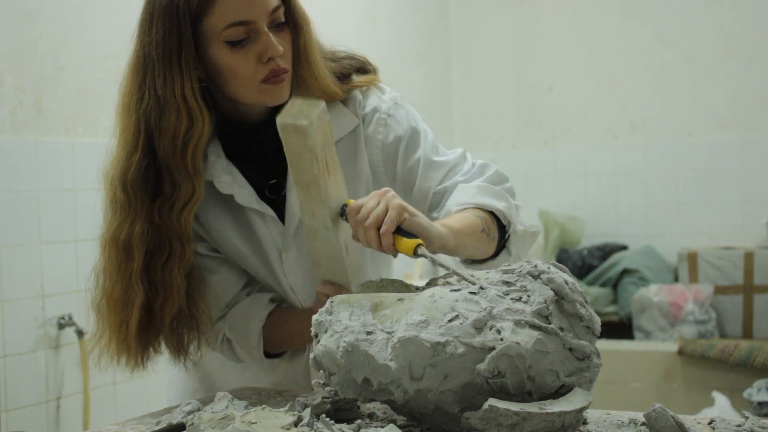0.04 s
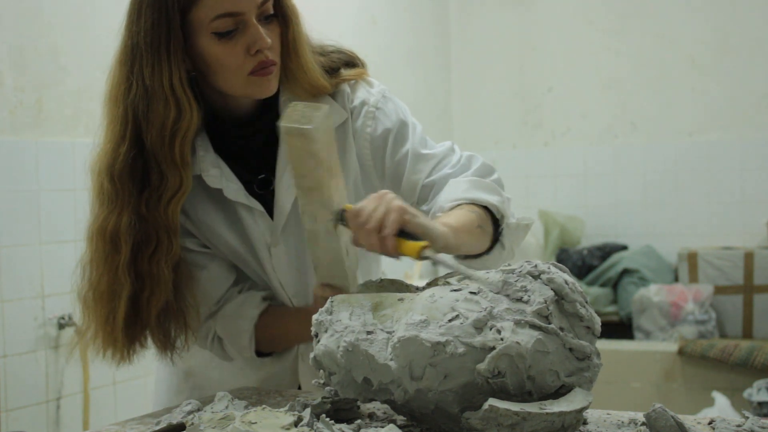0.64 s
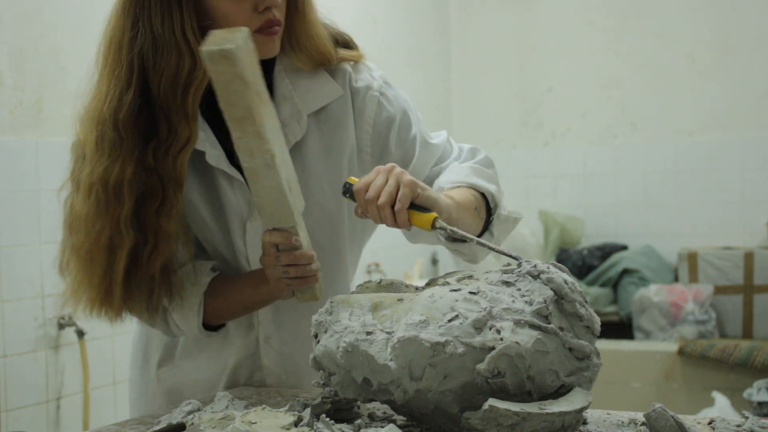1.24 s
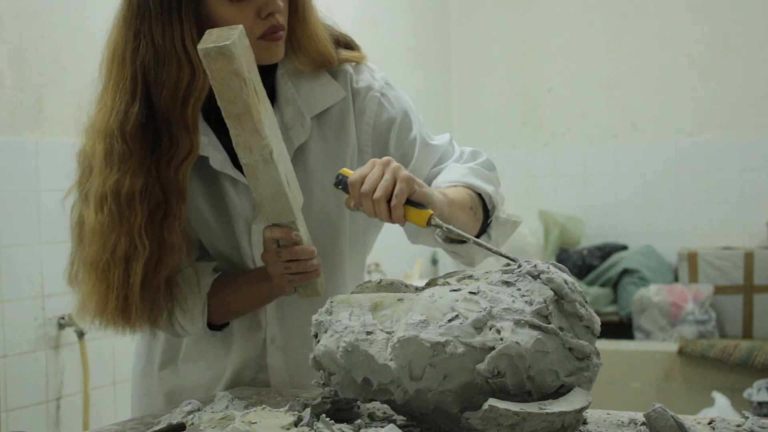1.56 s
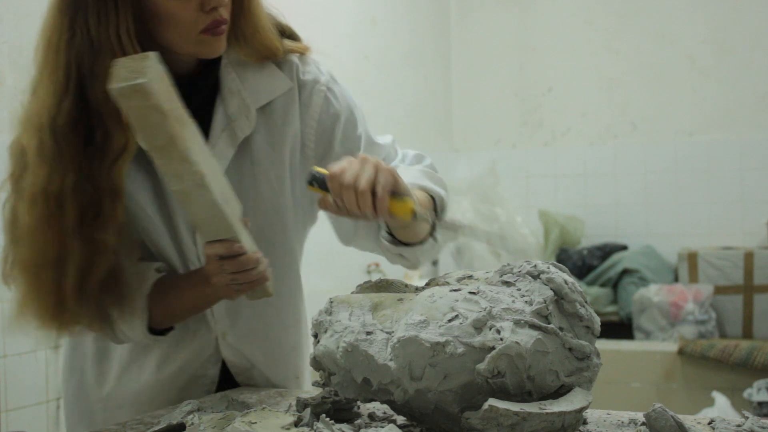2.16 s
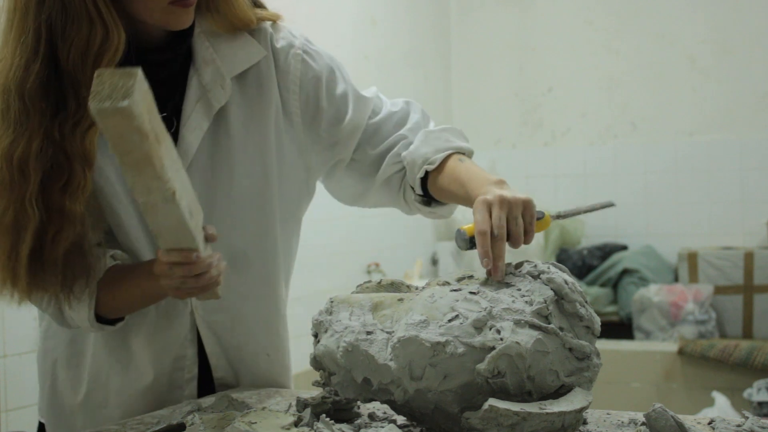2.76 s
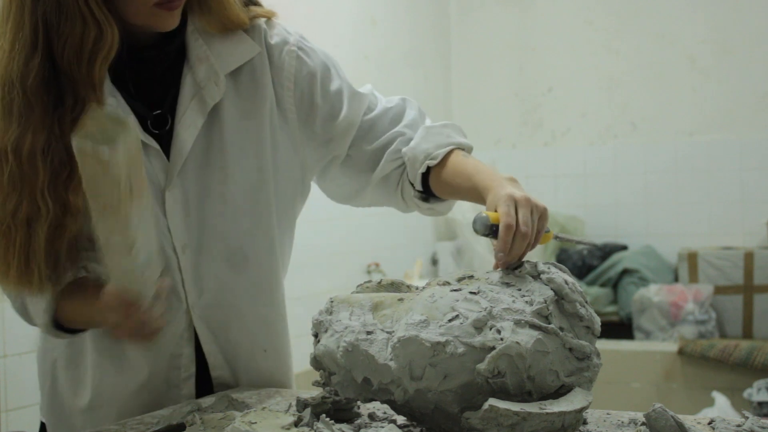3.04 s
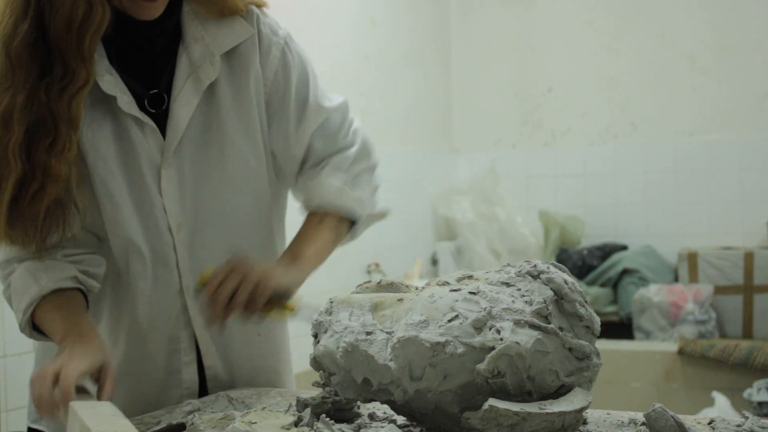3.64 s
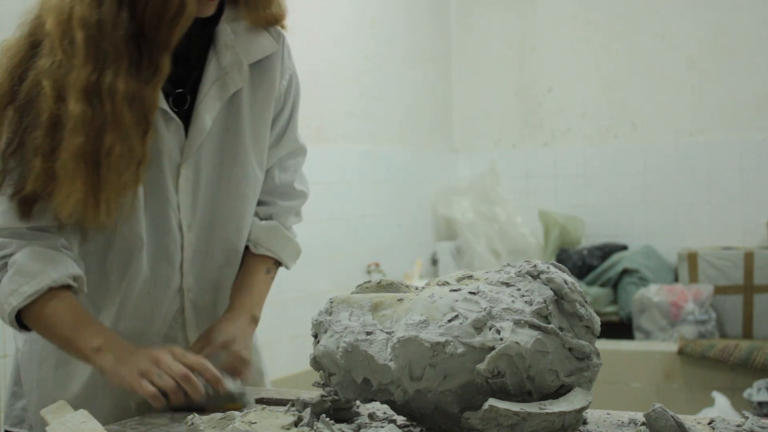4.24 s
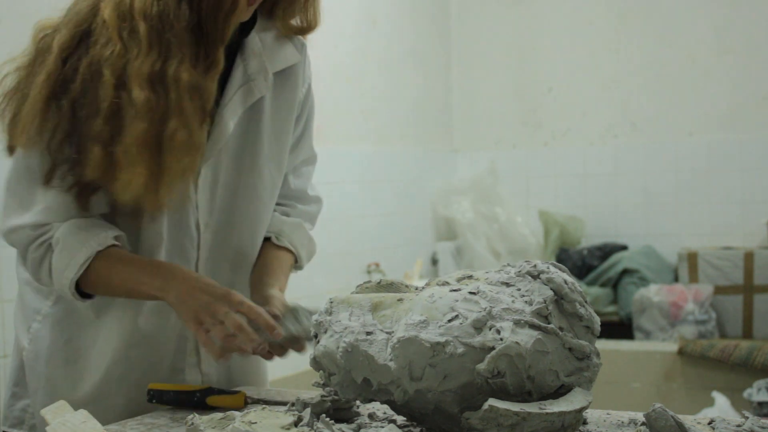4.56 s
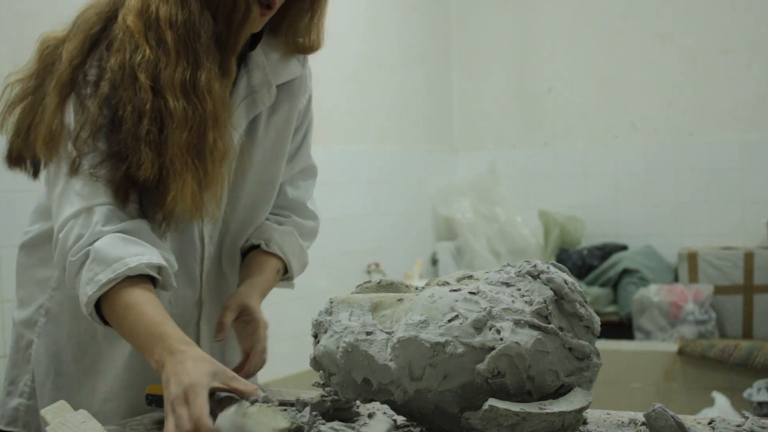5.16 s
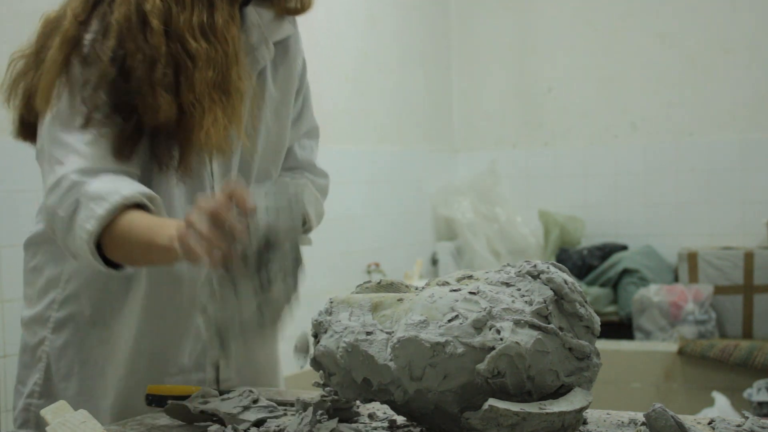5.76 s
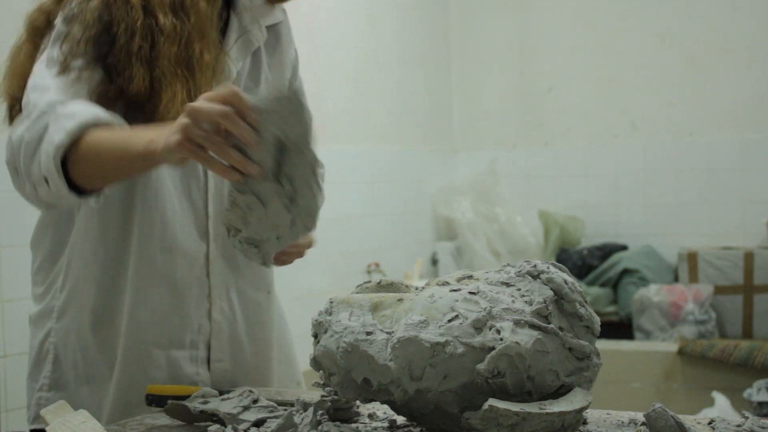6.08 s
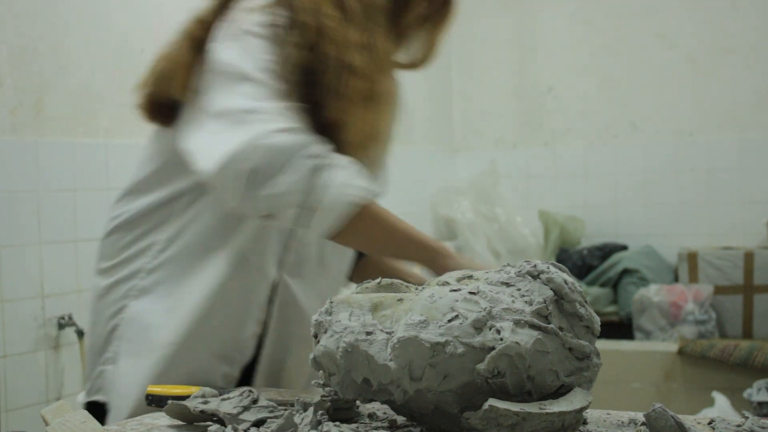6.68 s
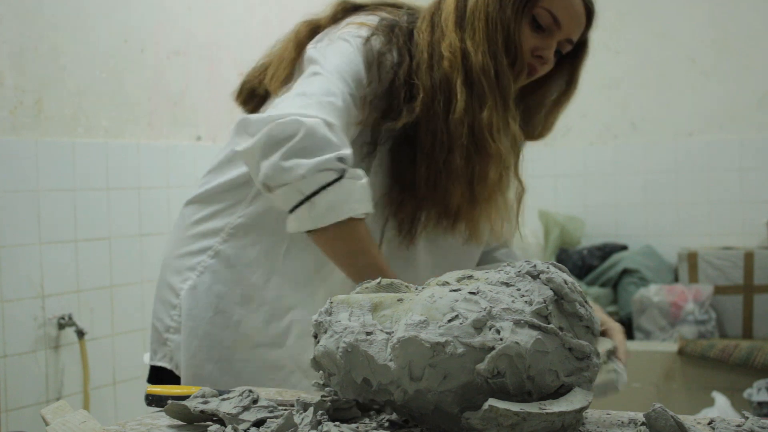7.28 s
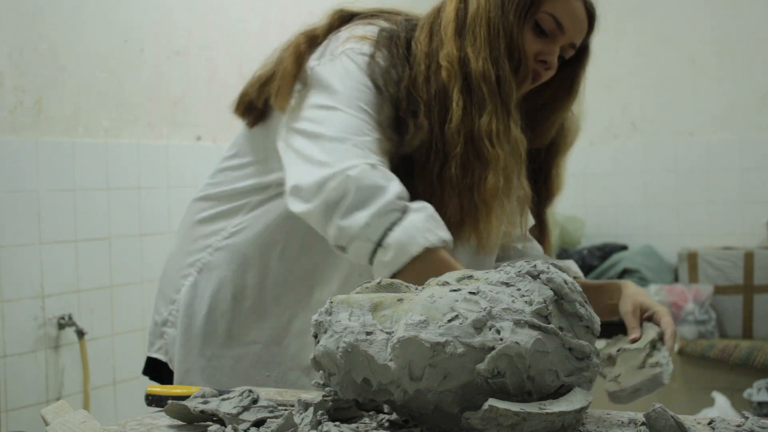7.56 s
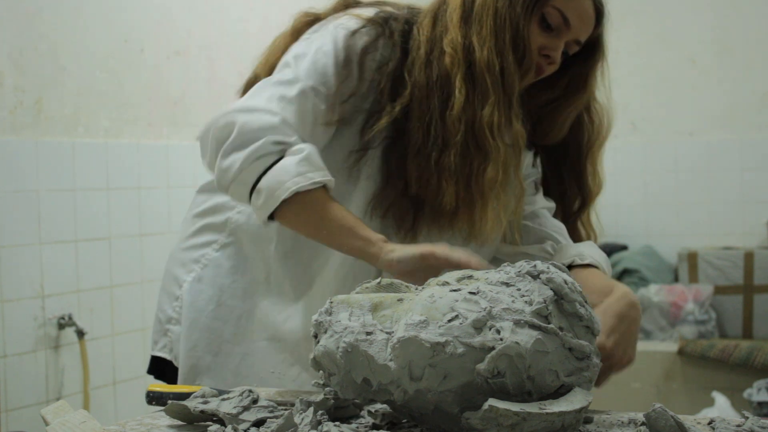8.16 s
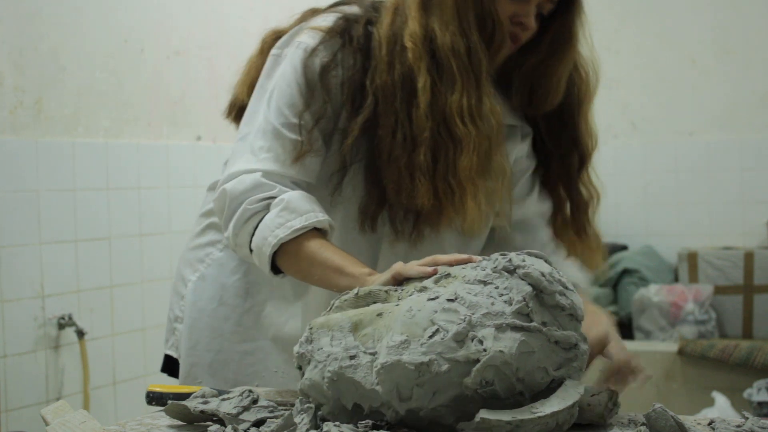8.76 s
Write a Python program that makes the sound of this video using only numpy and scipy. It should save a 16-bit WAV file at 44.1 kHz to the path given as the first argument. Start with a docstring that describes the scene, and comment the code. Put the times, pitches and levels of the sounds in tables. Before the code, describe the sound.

A wooden mallet strikes a steel chisel five times in quick succession, each knock ringing the steel and cracking plaster. After a lull with soft thumps, sleeves rustle and the tools clatter onto a table. A loose plaster slab knocks down, crumbs tick, and the slab slides with a gritty rasp. A machine hums low throughout in the echoing tiled studio, heard from one microphone near the table.

```python
"""A wooden mallet drives a steel chisel into a plaster mould, heard from one microphone near the table
in a tiled, echoing studio. Each blow knocks the handle, rings mould and steel and cracks the plaster.
Sleeves rustle and the tools clatter down on the table; a loose slab is lifted, dropped, laid aside
and slid along with a gritty rasp, while chips and crumbs tick as they fall.
Behind it all a machine hums steadily in the room."""
import sys
import numpy as np
from scipy import signal
from scipy.fft import rfft, irfft, next_fast_len
from scipy.io import wavfile
from scipy.ndimage import map_coordinates

SR = 44100
rng = np.random.default_rng(int(sys.argv[2]) if len(sys.argv) > 2 else 0)


def file_out(sig):
    """Save sig as 16-bit WAV at sys.argv[1]."""
    # one column per channel
    cols = np.atleast_2d(sig).T
    # limit, then scale
    lim = np.clip(cols, -1, 1)
    pcm = np.round(lim * 32767).astype(np.int16)
    wavfile.write(sys.argv[1], SR, pcm)


N = 388962
SIZE = 8192  # samples in one body's ring
HZ = np.fft.rfftfreq(SIZE, 1 / SR)

# spectra of the table top's thump, crushed grit and a plaster chip: (frequency [Hz], gain [dB])
TABLE_THUMP = [(30, -75), (75, 0.5), (105, 6), (140, 4), (220, 3.5), (330, 3.5), (700, -6.5), (3000, -15.5),
               (12000, -100)]
CRUSHED_GRIT = [(40, -40), (300, -20), (2000, -2), (3500, 0), (6000, -3), (9000, -10), (11000, -24),
                (13000, -39), (15000, -50)]
CHIP_SPECTRUM = [(100, -41), (1000, 7), (1430, -4.5), (1900, 0.5), (3000, 4), (4500, -0.5), (9500, -2),
                 (12000, -10), (15000, -23)]


def amp(db):
    """Decibels to gain."""
    return np.exp(np.asarray(db) * (np.log(10) / 20))


def unit(x):
    """Scale to rms 1."""
    return x / np.sqrt(np.mean(x ** 2) + 1e-20)


def along(points, hz):
    """Interpolate (Hz, value) points on a log frequency axis."""
    freqs, values = np.transpose(points)
    return np.interp(np.log(hz + 1), np.log(freqs + 1), values)


def wobble(rate):
    """A smooth random curve with `rate` knots a second."""
    coarse = np.linspace(0, N, SIZE)
    knots = rng.standard_normal(int(N * rate / SR) + 4)
    return np.interp(np.arange(N), coarse, map_coordinates(knots, [coarse * rate / SR]))


def filtered(x, response):
    """Filter x by a gain that is a function of frequency."""
    padded = next_fast_len(N + SR // 2)
    return irfft(rfft(x, padded) * response(np.fft.rfftfreq(padded, 1 / SR)), padded)[:N]


def noise(spectrum):
    """Coloured noise of rms 1."""
    return unit(filtered(rng.standard_normal(N), lambda hz: amp(along(spectrum, hz))))


def shape(spectrum):
    """A spectrum as gains of rms 1."""
    return unit(amp(along(spectrum, HZ)))


def modes(rows):
    """Gain of a set of resonances: (frequency [Hz], width [Hz], gain [dB])."""
    return np.sqrt(sum(abs(amp(db) * HZ * width / (hz * hz - HZ ** 2 + 1j * HZ * width)) ** 2
                       for hz, width, db in rows))


def pulse(*gains):
    """The minimum-phase ring of a body whose parts have these gains."""
    cepstrum = irfft(np.log(sum(g ** 2 for g in gains) + 1e-14) / 2)
    fold = np.r_[1, np.full(SIZE // 2 - 1, 2), np.zeros(SIZE // 2)]
    return irfft(np.exp(rfft(cepstrum * fold)))


def burst(t60):
    """Dying noise of unit energy."""
    t = np.arange(SIZE) / SR
    return unit(rng.standard_normal(SIZE) * amp(-60 * t / t60)) / np.sqrt(SIZE)


def grains(gain, spiky):
    """Half a second of tiny uneven slips ringing a body; spiky above 1 sets them apart."""
    white = rng.standard_normal(SR // 2)
    slips = np.sign(white) * abs(white) ** spiky
    return unit(signal.fftconvolve(slips, pulse(gain))[:len(slips)])


def disperse(x, spread_s, contact_s=0.000685):
    """Waves cross a rough solid at uneven speeds: each frequency leaves up to a few spreads late."""
    knots = contact_s + abs(rng.standard_normal(24)) * spread_s
    delay = np.interp(np.sqrt(HZ / HZ[-1]), np.linspace(0, 1, len(knots)), knots)
    wave = irfft(rfft(x) * np.exp(-2j * np.pi * np.cumsum(delay) * HZ[1]))[:SIZE * 7 // 8]
    press = np.minimum(np.arange(len(wave)) / SR / contact_s, 1)  # the force builds up
    return wave * np.sin(np.pi / 2 * press) ** 2


def add(track, s, sound):
    """Mix a sound in at s seconds."""
    start = round(s * SR)
    part = sound[max(-start, 0):N - start]
    track[max(start, 0):][:len(part)] += part


def studio(early_db, late_db, early_t60=0.13):
    """The path to the microphone: direct sound, scatter off table and mould, ring of the tiled walls."""
    # the room's reverberation: (frequency [Hz], t60 [s])
    decay = [(100, 1.36), (300, 1.03), (700, 0.92), (2000, 0.96), (5000, 0.8), (9000, 0.47), (14000, 0.041)]
    hz, t, bands = signal.stft(rng.standard_normal(SR), SR, nperseg=256)
    fade = amp(-60 * t / along(decay, hz)[:, None])
    build_up = 1 - np.exp(-t / 0.0064)
    tail = signal.istft(bands * fade * build_up, SR, nperseg=256)[1]
    echo = amp(late_db) * tail / np.linalg.norm(tail)
    echo[SR // 400:][:SIZE] += amp(early_db) * burst(early_t60)
    echo[0] += 1
    return echo


def machine(air_db=-49, drone_hz=28.2, drone_db=-1):
    """Room tone: a machine's slightly unsteady hum and swelling deep drone over steady noise."""
    # the machine's tones: (frequency [Hz], rms level [dB])
    hum_tones = [(129.2, -55.5), (200, -47), (321, -58), (399, -61), (598, -65)]
    # swell of its drone: (time [s], relative level [dB])
    swell = [(0.0, -53), (0.61, -44), (1.13, -53), (1.35, -63), (1.55, -49), (2.48, -41.5), (3.24, -51),
             (3.51, -43), (4.22, -48), (4.52, -51), (5.03, -46), (5.45, -62), (5.7, -54), (7.05, -44.5),
             (8.72, -54.5), (8.82, -92)]
    # the room's noise: (frequency [Hz], gain [dB])
    air = [(20, -40), (41, -28), (62, -14), (100, -14), (140, -16), (170, -20.5), (290, -15.5), (450, -20),
           (800, -23), (2000, -25.5), (4000, -31), (6300, -34), (10000, -43.5), (15500, -58.5)]
    t = np.arange(N) / SR

    def tone(hz, drift_rad):
        return np.sqrt(2) * np.sin(2 * np.pi * hz * t + drift_rad * wobble(2.86))

    hum = sum(amp(db + 0.38 * wobble(6.1)) * tone(hz, drift_rad=0.051) for hz, db in hum_tones)
    drone = amp(np.interp(t, *np.transpose(swell)) + drone_db) * tone(drone_hz, drift_rad=0.84)
    return hum + drone + amp(air_db) * noise(air)


def sleeves(middle_s=3.38, half_width_s=0.27, level_db=-50.5, flutter_db=2):
    """Coat sleeves rustle as the arms swing down to the table."""
    # rubbing cotton: (frequency [Hz], gain [dB])
    cotton = [(150, -23), (500, 9), (1000, 7), (2000, 2), (3500, -13), (7000, -36), (14000, -45)]
    swing = np.exp(-((np.arange(N) / SR - middle_s) / half_width_s) ** 2)
    return swing * amp(level_db + flutter_db * wobble(25.3)) * noise(cotton)


def bumps(gain_db=21):
    """A soft push only thumps the table top."""
    # bumps against the table: (time [s], relative level [dB])
    nudges = [(1.135, -41), (1.323, -27), (1.718, -30.5), (1.902, -25), (6.9, -24)]
    out = np.zeros(N)
    soft = 1 / (1 + (HZ / 220) ** 4)
    for s, db in nudges:
        thump = signal.fftconvolve(pulse(shape(TABLE_THUMP) * soft), burst(t60=0.12))
        add(out, s, amp(db + gain_db) * signal.fftconvolve(thump, studio(early_db=-5, late_db=-2.5)))
    return out


def crumbs(count, from_s=5.87, to_s=6.15, scatter_db=11, octaves=0.52):
    """Crumbs trickle at random off the lifted slab: (time [s], relative level [dB], ring [Hz])."""
    times = from_s + rng.random(count) * (to_s - from_s)
    size, pitch = rng.standard_normal((count, 2)).T
    return list(zip(times, -56.5 + scatter_db * size, 6500 * 2 ** (octaves * pitch)))


def chips(gain_db=21, ring_db=9):
    """Small hard flakes tick, each at its own pitch; the lower the pitch, the duller the tick."""
    # plaster snapping off and landing: (time [s], relative level [dB], ring [Hz])
    ticks = [(0.668, -40, 7600), (0.991, -33.5, 7060), (5.141, -41.5, 10000), (5.506, -33, 5260),
             (5.688, -40, 5900), (5.777, -37, 4060), (5.933, -51, 7040), (6.096, -42, 6400),
             (8.508, -43.5, 8750)]
    out = np.zeros(N)
    for s, db, ring_hz in ticks + crumbs(count=22):
        ring = np.hypot(1, modes([(ring_hz, 0.18 * ring_hz, ring_db)]))
        dulling = np.hypot(1, HZ / (0.66 * ring_hz))
        flake = unit(shape(CHIP_SPECTRUM) * ring / dulling)
        add(out, s, amp(db + gain_db) * disperse(pulse(flake), spread_s=0.000645))
    return signal.fftconvolve(out, studio(early_db=-1.5, late_db=1.5))[:N]


def bounces(hits, own_modes, gain_db, spread_s):
    """A piece ticks on the table with short, high modes; a softer contact is duller."""
    out = np.zeros(N)
    for s, db, dull_hz in hits:
        ring = unit(modes(own_modes) * shape(CHIP_SPECTRUM) / np.hypot(1, (HZ / dull_hz) ** 2))
        add(out, s, amp(db + gain_db) * disperse(pulse(ring), spread_s))
    return signal.fftconvolve(out, studio(early_db=0, late_db=-2))[:N]


def falling_pieces():
    """A thin hard shard drops and bounces once; a thicker lump falls off the lifted slab and hops."""
    # each piece's ring: (frequency [Hz], width [Hz], gain [dB])
    shard_modes = [(1410, 140, 3), (1810, 220, -5), (2540, 160, -7), (3000, 150, -5), (4800, 660, -4),
                   (5700, 270, -3), (6350, 350, -1), (7400, 450, -5), (8050, 450, 4.5), (9280, 440, 6),
                   (10550, 550, 3), (12500, 1500, -12)]
    lump_modes = [(1620, 90, -1), (2580, 340, 0.5), (3070, 160, 2), (3330, 130, 2), (3950, 280, -1),
                  (4850, 220, 4.5), (6000, 360, 1), (7600, 1000, 0.5)]
    # their landings: (time [s], relative level [dB], dull above [Hz])
    shard_hits = [(4.577, -21, 12000), (4.5905, -30, 5000)]
    lump_hits = [(6.133, -28.5, 6500), (6.1445, -30, 6000), (6.298, -41.5, 4000)]
    shard = bounces(shard_hits, shard_modes, gain_db=18, spread_s=0.00049)
    lump = bounces(lump_hits, lump_modes, gain_db=18.5, spread_s=0.00093)
    return shard + lump


def slab_slide(dust_gain_db=-4, ring_db=-0.5, uneven_db=1.9, sag_db_per_s=17, stop_db_per_s=162):
    """Each push drags plaster in uneven grains, ringing at the contact's pitch; dust hisses under it."""
    # pushes: (time [s], rise [s], length [s], relative rasp [dB], relative dust [dB], ring [Hz])
    strokes = [(6.863, 0.018, 0.037, -42, -56, 452), (7.045, 0.011, 0.027, -36.5, -48, 800),
               (7.15, 0.06, 0.075, -28, -47, 590), (7.228, 0.0091, 0.034, -24, -48, 640),
               (7.269, 0.042, 0.093, -32, -41, 1050), (7.337, 0.009, 0.022, -35.5, -46, 730),
               (7.676, 0.12, 0.15, -28.5, -45, 780), (7.818, 0.12, 0.21, -32, -40, 880),
               (8.231, 0.021, 0.075, -34, -50, 540), (8.548, 0.037, 0.039, -45.5, -44, 900),
               (8.757, 0.027, 0.028, -30, -42, 850)]
    # plaster dragged over plaster: (frequency [Hz], gain [dB])
    rasp = [(88, -42), (150, -6.5), (203, -17), (327, -1.5), (468, -1.5), (982, -3), (1460, -6.5),
            (2150, -10.5), (2500, -9.5), (4000, -21), (7200, -26), (14000, -48)]
    out = np.zeros(N)
    t = np.arange(SR // 2) / SR
    for s, rise, length, rasp_db, dust_db, ring_hz in strokes:
        push = np.minimum(t / rise, 1) * amp(-stop_db_per_s * np.maximum(t - length, 0))
        body = shape(rasp) * np.hypot(1, modes([(ring_hz, 0.5 * ring_hz, ring_db)]))
        add(out, s, push * amp(rasp_db - sag_db_per_s * t) * grains(body, spiky=2.8))
        add(out, s, push * amp(dust_db + dust_gain_db) * grains(shape(CRUSHED_GRIT), spiky=4))
    walls = studio(early_db=-0.5, late_db=-3)
    return signal.fftconvolve(amp(uneven_db * wobble(45)) * out, walls / np.linalg.norm(walls))[:N]


def knocks(hits, spectrum, own_modes, ring_width, body_db, thump_db, early_db, late_db):
    """A thing lands and rings, the table thumps, and cracking grit draws the contact into a crunch."""
    out = np.zeros(N)
    for s, db, table_db, ring_hz, ring_db, grit, crack_db in hits:
        grit = np.clip(grit, 0.1, 1)
        force = np.sqrt(grit) * burst(t60=0.5 * grit)
        force[0] += np.sqrt(1 - grit)  # the clean part of the impact
        contact = np.hypot(1, modes([(ring_hz, ring_width * ring_hz, ring_db)]))
        body = amp(db + body_db) * unit(shape(spectrum) * np.hypot(1, modes(own_modes)) * contact)
        thump = amp(table_db + thump_db) * shape(TABLE_THUMP)
        crack = amp(db + crack_db) * shape(CRUSHED_GRIT)
        hit = disperse(pulse(body, thump, crack), spread_s=0.00126)
        crunch = signal.fftconvolve(hit, force)
        add(out, s, signal.fftconvolve(crunch, studio(early_db, late_db)))
    return out


def slab_knocks():
    """The loose plaster slab knocks on the table and against the mould."""
    # contacts, levels relative:
    # (time [s], level [dB], thump [dB], ring [Hz], ring gain [dB], grit [0-1], crack [dB])
    hits = [(4.958, -29, -50.5, 585, 34, 0.44, 5), (5.000, -27, -41.5, 1200, 19, 0.98, 11.5),
            (5.027, -16, -38.5, 242, 8.5, 0.15, 7.5), (5.240, -27, -42, 347, 21, 0.4, 15),
            (5.289, -22.5, -47, 301, 17, 0.1, 3), (5.303, -7.5, -35.5, 493, 8.5, 0.1, 7.5),
            (5.492, -28, -40, 500, 15, 0.45, -5), (5.711, -33, -44.5, 310, 28, 0.47, 9),
            (5.879, -38, -46, 382, 24, 1, -6), (7.229, -14.5, -46, 910, 13.5, 0.44, -7.5),
            (7.345, -20.5, -49.5, 796, 17, 0.42, 7), (7.655, -28.5, -51, 715, 28, 0.53, -19),
            (8.231, -27, -45.5, 1100, 8, 0.63, -2), (8.742, -26.5, -50.5, 1040, 14, 0.65, -4)]
    # the slab's broad colour: (frequency [Hz], gain [dB])
    spectrum = [(35, -73), (80, -29), (140, 6), (300, 2), (520, -0.5), (800, -1.5), (1100, -6.5),
                (1350, -6.5), (1600, -9), (1930, -2.5), (2300, -9.5), (2750, -7.5), (4000, -17.5),
                (8000, -36), (14000, -52)]
    # its own ring: (frequency [Hz], width [Hz], gain [dB])
    own_modes = [(522, 65, 2), (1763, 165, 4.5), (2590, 88, -10), (3500, 160, 3), (6200, 400, 0)]
    return knocks(hits, spectrum, own_modes, ring_width=0.35,
                  body_db=20, thump_db=37.5, early_db=3.5, late_db=0)


def tools_down():
    """Wood and steel tools clatter onto the table, near the microphone."""
    # contacts, levels relative:
    # (time [s], level [dB], thump [dB], ring [Hz], ring gain [dB], grit [0-1], crack [dB])
    hits = [(3.619, -13.5, -23, 345, 46, 0.64, 1.5), (3.656, -41, -27, 380, 2, 0.6, 6),
            (3.724, -10, -50, 1900, -16, 0.48, 2), (3.852, -7.5, -27, 1030, 11, 0.24, 0),
            (3.958, -23, -46, 1140, -1, 0, 3), (4.020, -11, -26.5, 563, 12.5, 0.2, -8.5),
            (4.034, -24, -26, 2150, 10, 0.83, 13), (4.1665, -17.5, -30.5, 870, 9.5, 0.32, 3)]
    # the tools' broad colour: (frequency [Hz], gain [dB])
    spectrum = [(35, -34), (100, -19), (380, 1), (700, 5), (1250, 2.5), (2500, -0.5), (4000, -12),
                (8000, -53), (14000, -62)]
    # their own ring: (frequency [Hz], width [Hz], gain [dB])
    own_modes = [(814, 49, 1), (896, 40, 5.5), (1075, 44, -1), (1210, 50, -4), (1380, 45, 4),
                 (2150, 90, -5), (2820, 130, -3)]
    return knocks(hits, spectrum, own_modes, ring_width=0.26,
                  body_db=18, thump_db=25.5, early_db=-2.5, late_db=-2.5)


def mallet(gain_db=21, thump_db=-11):
    """Each blow sounds handle, mould and table and cracks plaster; the chisel rings mostly off the walls."""
    # blows, levels relative: (time [s], level [dB], crack [dB], chisel ring [dB])
    blows = [(-0.135, -14, 1, 18), (0.077, -15, -5, 13.5), (0.295, -15.5, -0.5, 2.5), (0.503, -15.5, 3, 11),
             (0.7052, -15, 4.5, 4.5), (0.9416, -24.5, -1.5, 9.5)]
    # resonances: (frequency [Hz], width [Hz], gain [dB])
    mould_modes = [(87, 31, -2.5), (134, 35, -8), (218, 9.4, 4), (300, 58, 4), (460, 42, -3.5),
                   (545, 34, 0.5), (644, 44, -6), (969, 21, -4), (1323, 150, -6.5), (1753, 17, -5.5),
                   (2090, 250, -15), (2560, 270, -13.5), (4340, 260, -23), (4900, 460, -21.5)]  # mallet, handle and mould ringing together
    handle_modes = [(468, 253, 3), (2745, 390, -6)]  # the dead knock of wood on the handle
    chisel_modes = [(1140, 71, -9.5), (1173, 49, -12), (1237, 86, -12)]  # the steel shaft bending
    # breaking plaster: (frequency [Hz], gain [dB])
    fracture = [(40, -32), (700, -10.5), (1500, -35), (3500, -47), (6500, -30), (9000, -32), (11000, -44),
                (13000, -54), (15000, -64)]
    out = np.zeros(N)
    soft = 1 / np.sqrt(1 + (HZ / 6500) ** 12)  # wood is too soft to ring the highest modes
    body = modes(mould_modes) * soft
    thump = amp(thump_db + along(TABLE_THUMP, HZ))
    handle = pulse(modes(handle_modes) ** 2)
    chisel = pulse(modes(chisel_modes) ** 2)
    scale = amp(gain_db) / np.sqrt(np.mean(body ** 2))
    for s, db, crack_db, ring_db in blows:
        force = amp(db) * scale
        walls = studio(early_db=5, late_db=0.5, early_t60=0.11)
        mould = disperse(pulse(body, thump), spread_s=0.000806)
        crack = pulse(amp(crack_db + along(fracture, HZ)))
        add(out, s, force * signal.fftconvolve(mould, walls))
        add(out, s, force * signal.fftconvolve(crack, walls))
        handle_walls = studio(early_db=-0.5, late_db=-2, early_t60=0.073)
        add(out, s, force * signal.fftconvolve(handle, handle_walls))
        add(out, s, force * amp(ring_db) * signal.fftconvolve(chisel, studio(early_db=5, late_db=9)))
    return out


def scene():
    """The studio from one microphone near the table."""
    handling = tools_down() + slab_knocks() + falling_pieces()
    return (mallet() + handling + bumps() + chips() + slab_slide() + sleeves() + machine())[None]


def record(dry):
    """The microphone's mono channel keeps nothing above 15.6 kHz."""
    return filtered(dry[0], lambda hz: hz < 15600)[None]


dry = scene()
out = record(dry)
file_out(out)
```